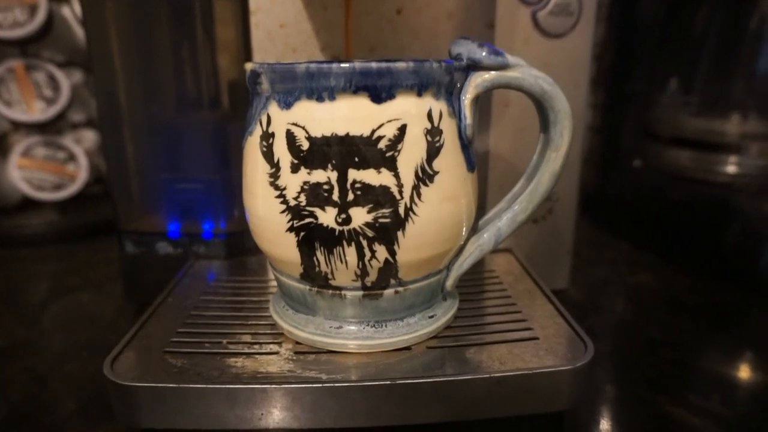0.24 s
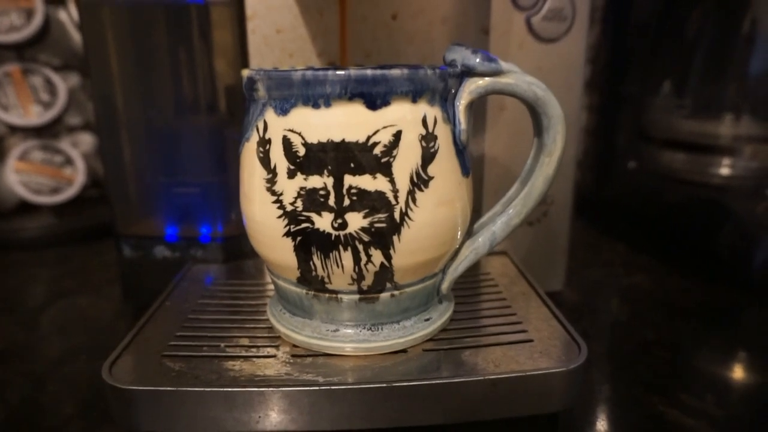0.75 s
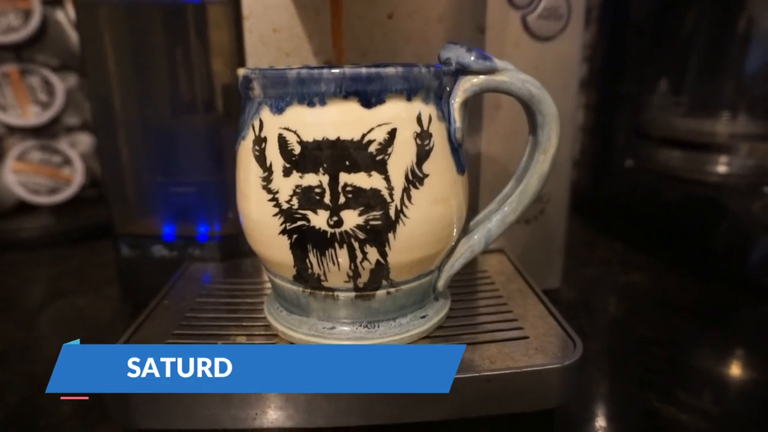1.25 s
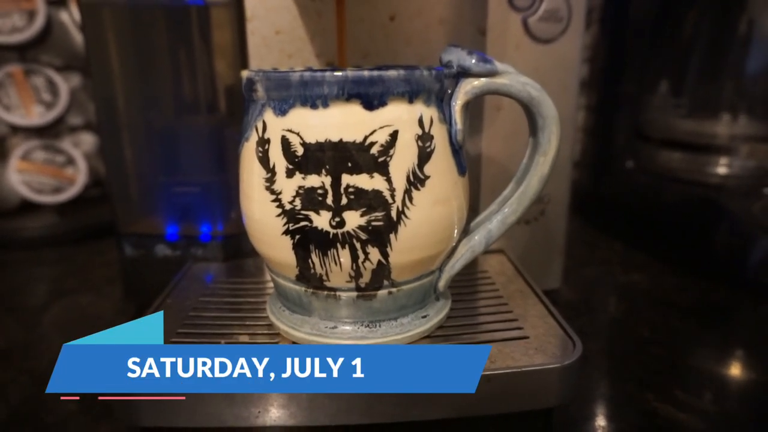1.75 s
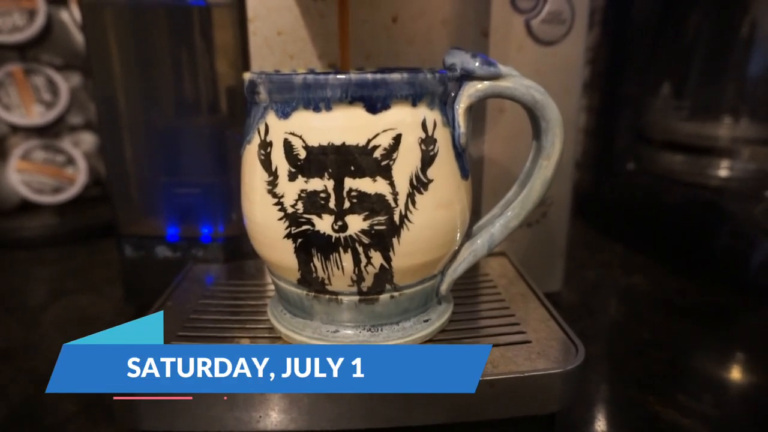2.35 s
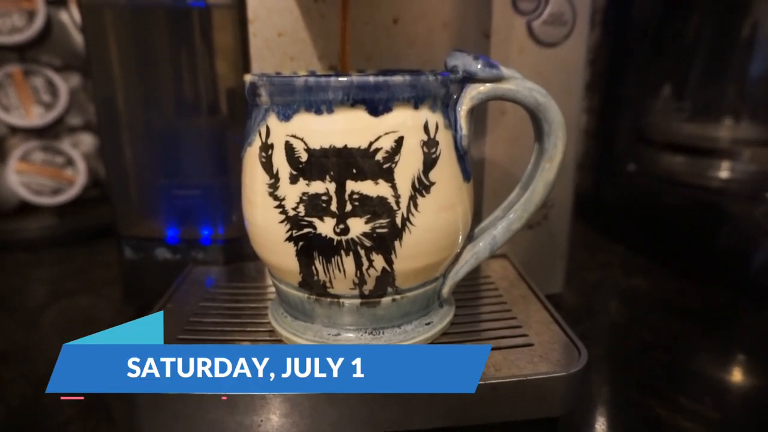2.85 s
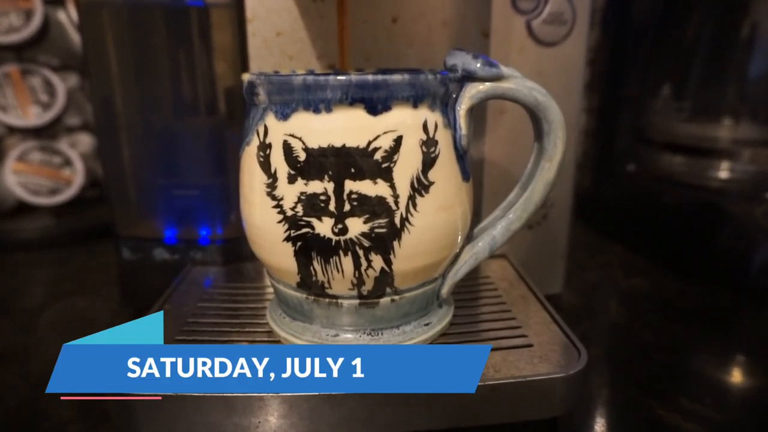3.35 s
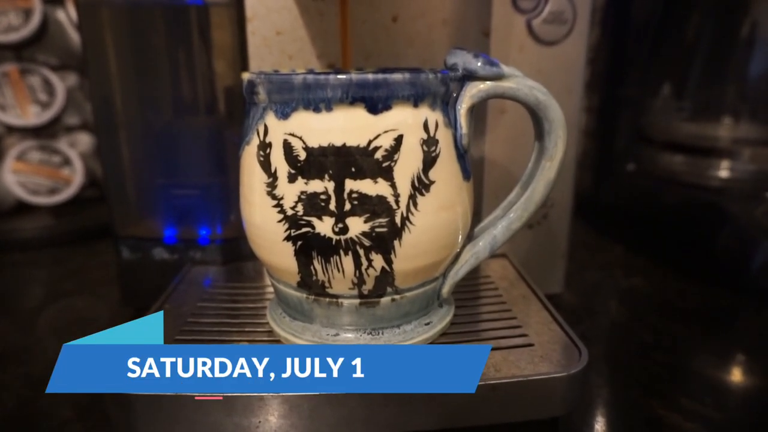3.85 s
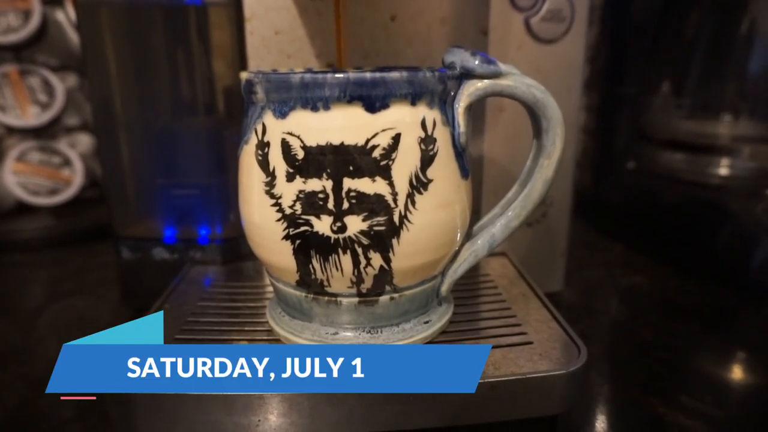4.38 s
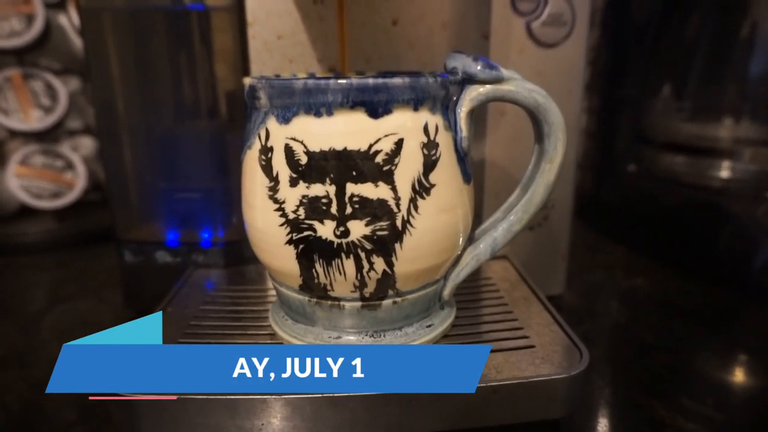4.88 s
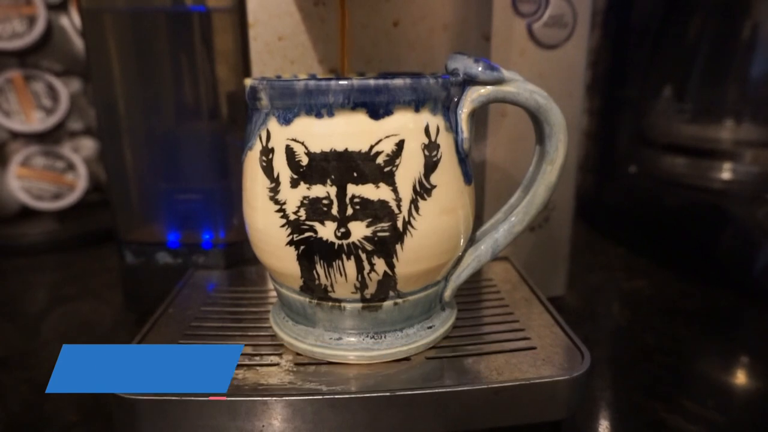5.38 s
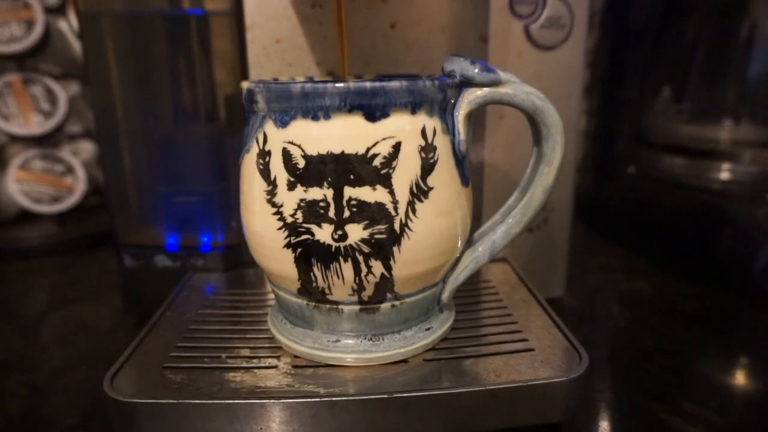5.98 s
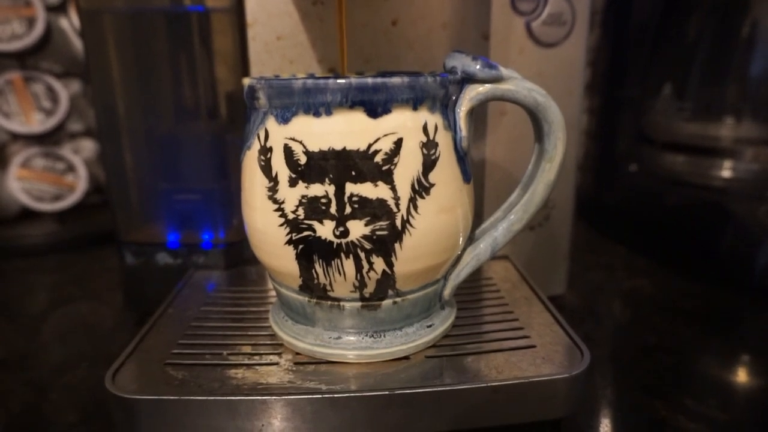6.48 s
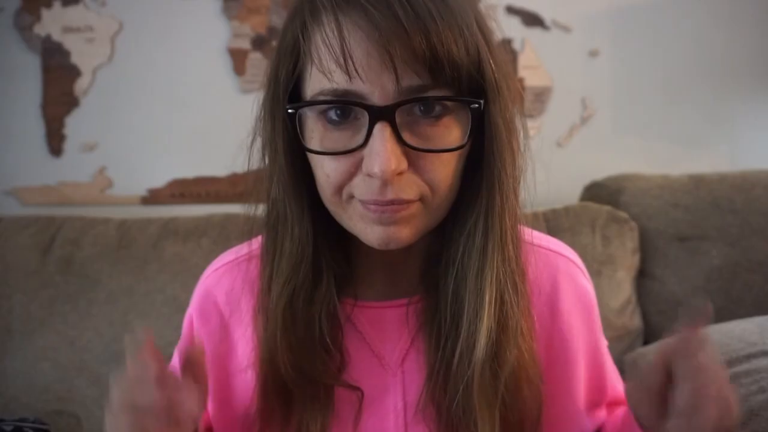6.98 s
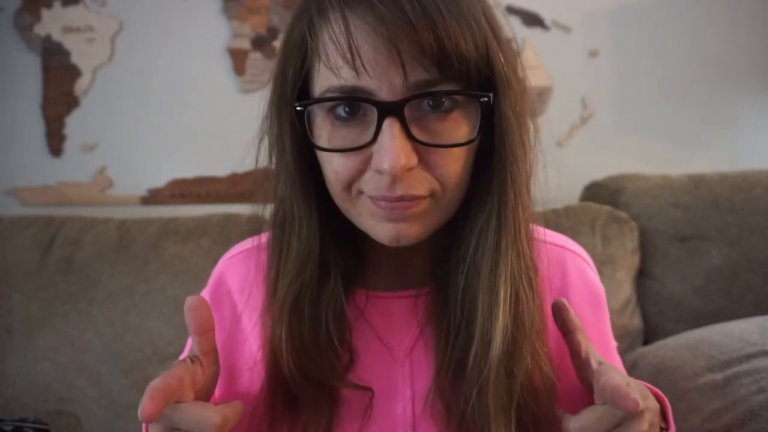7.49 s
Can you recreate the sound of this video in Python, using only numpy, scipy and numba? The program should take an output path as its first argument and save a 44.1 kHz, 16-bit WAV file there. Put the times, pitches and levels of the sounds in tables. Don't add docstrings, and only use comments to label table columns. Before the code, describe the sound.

Close up, coffee trickles into a stoneware mug, first splashy and ringing, then gurgling rapidly with plinking droplets, before an abrupt near-silent room tone.

```python
import sys
import numpy as np
from scipy import signal
from scipy.fft import rfft, irfft, next_fast_len
from scipy.io import wavfile
from scipy.ndimage import uniform_filter1d
from numba import njit

SR = 44100
rng = np.random.default_rng(int(sys.argv[2]) if len(sys.argv) > 2 else 0)


def wrap_up_sound(samples):
    columns = np.atleast_2d(samples).T
    tamed = np.clip(columns, -1, 1)
    steps = np.round(tamed * 32767).astype(np.int16)
    wavfile.write(sys.argv[1], SR, steps)


def nominal_scale(level):
    x = np.asarray(level, float) / 20
    return 10 ** x


N = 340829
T = np.arange(N) / SR

# (time [s], resonance [Hz], left minus right [dB])
AIR_COLUMN = [
    (0, 618, 0),
    (1.8, 664, 2),
    (2.5, 778, 3.5),
    (7, 736, 4),
]
# (time [s], depth [0-1])
PLUNGE = [
    (0, 0),
    (1.5, 0.01),
    (2.0, 0.39),
    (3, 0.59),
    (4.4, 0.39),
    (5.3, 0.86),
    (6.1, 0.77),
    (7, 0.93),
]
# (depth [0-1], level [dB])
AIR_LEVEL = [(0, -36), (.2, -35), (.36, -45), (.55, -41), (1.05, -40)]
# (shallow level [dB], deep level [dB])
POOL_LEVEL = (-34, -42)
WALL_LEVEL = (-37, -47)
# (time [s], level [dB])
MIST_LEVEL = [
    (0, -50),
    (1.2, -43.5),
    (2.3, -49),
    (7, -52),
]
# (time [s], lift [dB], length [s])
WALL_SURGES = [(.07, 8.5, 0.078), (.19, 11.5, 0.066), (.285, 9, 0.023), (.345, 12.5, 0.043),
               (.435, 9.5, 0.034), (.52, 3.5, 0.12), (.63, 11.5, 0.031), (.72, 11.5, 0.074),
               (.91, 10, 0.077), (1.12, 7.5, 0.14)]
# (time [s], lift [dB], length [s])
AIR_SWELLS = [(.33, 7.7, 0.024), (.47, 1.3, 0.024), (.63, 3.7, 0.023), (.73, 3.3, 0.094), (.98, 2.5, 0.052),
              (1.12, 6.8, 0.032), (1.3, 4.5, 0.12), (1.5, 9.1, 0.078), (1.72, 8, 0.08), (1.93, 5.9, 0.094)]
STREAM_BREAKS = [.245, .31, .672, .975]
# (frequency [Hz], width [Hz], level [dB])
POOL_MODES = [(996, 83, 3.5), (1185, 168, 2.5), (1418, 300, -3), (925, 83, -0.5)]
WALL_MODES = [(1998, 330, -4), (2400, 117, -2.5), (2640, 99, -0.5), (2950, 73, 3.5), (3198, 290, -7),
              (4020, 127, -2), (4804, 150, -11)]
# (frequency [Hz], level [dB per Hz])
SPRAY_COLOUR = [(3000, -7.5), (4500, 6.5), (5300, 4), (8000, 3), (10700, 0), (16000, -5.5)]
# (frequency [Hz], level [dB rms])
HUM_LINES = [(93.5, -69), (118.4, -62.5), (149, -67.5), (188.4, -67), (296.1, -63.5), (419.9, -55)]
# (frequency [Hz], level [dB per Hz])
KITCHEN_COLOUR = [(25, -36), (50, -26.5), (108, -17), (230, -14.5), (420, -12.5), (600, -0.5),
                  (1500, -19.5), (16000, -64)]
LOUNGE_COLOUR = [(25, -27), (90, -15), (155, -20), (270, -14.5), (420, -21.5), (840, -16), (1600, -18.5),
                 (16000, -42)]
# (time [s], peak level [dB], pitch [Hz]); the second table holds further, mostly fainter spits
STREAM_SPITS = [(0.177, -28, 11300), (0.2985, -16, 6630), (0.4003, -17.5, 7700), (0.4371, -26.5, 14400),
                (0.9062, -25.5, 7640), (1.082, -21, 13700), (1.1134, -22.5, 5860), (1.1406, -25, 6840),
                (1.2963, -24.5, 6500), (1.4125, -24.5, 6040), (1.5344, -26, 7000), (1.6246, -23.5, 6000),
                (1.638, -16.5, 12370), (1.9205, -25.5, 6060), (2.0339, -20.5, 6170), (2.144, -24, 5980),
                (2.177, -26.5, 13000), (2.6675, -25.5, 10230), (3.214, -22, 6800), (3.791, -19.5, 6160),
                (4.0987, -22, 9300), (4.1675, -19.5, 6310), (4.202, -25, 5960), (4.24, -17, 11520),
                (5.8965, -26, 7740), (5.9163, -26, 8900), (5.9467, -24, 5730), (6.2711, -22.5, 6870),
                (6.7905, -24.5, 7200), (6.9748, -17, 6330)]
MORE_SPITS = [(0.262, -29.5, 13600.0), (0.4086, -31, 9400), (0.6854, -32.5, 11430.0),
              (1.021, -31.0, 6400), (1.0627, -29, 14200), (1.1667, -46, 10620.0), (1.4552, -30, 6440),
              (1.5674, -33, 9000), (1.6172, -29.5, 6130), (1.6786, -30, 9850), (1.788, -36.5, 10800),
              (1.9344, -30.5, 8900), (2.464, -31.5, 11600), (2.8178, -29.5, 5430), (3.423, -32, 9890.0),
              (3.858, -32, 10000), (4.4128, -32, 9800), (4.8202, -26.5, 8430), (5.262, -31.5, 8460),
              (5.3646, -34.5, 7900), (5.421, -28.5, 8900), (5.63, -30.5, 9600), (5.9784, -29, 9300),
              (6.9447, -28.5, 7200)]
# (time [s], pitch [Hz])
FAINT_SPITS = [(0.446, 9100), (1.034, 8140), (1.385, 7750), (1.7407, 12850), (1.975, 5700), (2.7805, 6200),
               (3.081, 10200), (3.2792, 7880), (4.551, 7100), (5.9584, 9050), (6.577, 6800)]
# (time [s], peak level [dB], pitch [Hz])
STREAM_PLINKS = [(0.1946, -25, 2640), (0.77, -15.5, 4930), (0.7918, -18, 2950), (1.1111, -20, 2650),
                 (1.1747, -19, 2180), (1.2967, -21.5, 2500), (1.4298, -19, 2260), (1.535, -19.5, 4830),
                 (1.807, -14.5, 2527), (1.8843, -20, 2740), (2.1566, -20.5, 2460), (2.4172, -19, 2530),
                 (2.68, -23.5, 4000), (2.7222, -19.5, 4050), (2.781, -17, 2850), (3.3653, -21, 3100),
                 (3.6965, -18.5, 3930), (3.7904, -18.5, 4080), (3.9487, -24, 2890), (3.9804, -21.5, 2620),
                 (4.0987, -15, 3940), (4.1471, -20.5, 2990), (4.8206, -18.5, 3970), (5.6156, -25.5, 4030),
                 (5.7024, -22.5, 4020), (5.9164, -16.5, 2750), (6.0528, -18, 2900), (6.5753, -21.5, 3930),
                 (6.7269, -22, 3000), (6.9749, -20.5, 4160)]
MORE_PLINKS = [(1.3197, -29, 2540), (1.369, -24.5, 2790), (1.4129, -29, 3670), (1.57, -27.0, 2880),
               (1.698, -25, 3770), (1.7574, -28, 2670), (1.817, -27, 2780), (1.8423, -26, 3520),
               (1.9102, -26, 2540), (2.0382, -23, 3600), (2.1867, -28, 2390), (2.4306, -24, 2820),
               (2.4639, -22.5, 2600), (2.5453, -28, 2420), (2.5856, -24.5, 2700), (2.6349, -19.5, 2620),
               (2.7655, -26.0, 2760), (2.993, -27.5, 2760), (3.0176, -30, 2710), (3.3374, -20, 2640),
               (3.4234, -25, 2850), (3.5474, -26, 2590), (3.6268, -25, 3180), (3.892, -23.5, 2770),
               (3.9137, -26.5, 3150), (3.9943, -26, 3280), (4.1159, -34, 2500), (4.202, -28, 2870),
               (4.5152, -24, 3560), (5.152, -23, 2490), (5.2293, -26, 2890), (5.2628, -22.5, 2850),
               (5.364, -25.5, 3010), (5.9475, -24, 3440), (6.48, -25, 2580), (6.7911, -25, 2800)]
# (time [s], pitch [Hz])
FAINT_PLINKS = [(1.0405, 2180), (2.2514, 2590), (2.845, 2650), (3.317, 2650), (4.8857, 2400), (4.906, 2030),
                (5.282, 4100), (5.33, 3880), (5.3414, 2910), (5.75, 3940), (6.213, 2360), (6.886, 2900),
                (6.904, 2910)]
# (time [s], peak level [dB], pitch [Hz])
FIRST_BUBBLES = [(0.3236, -31, 653), (0.3461, -25, 606), (0.6323, -22.0, 670.0), (0.6431, -30, 684),
                 (0.7432, -26, 640), (0.8082, -24.0, 696), (1.0432, -31, 670), (1.1236, -28, 674),
                 (1.2485, -33, 670.0), (1.3695, -18, 640), (1.51, -24, 650), (1.7592, -21.5, 760.0)]
# (time [s], peak level [dB], pitch [Hz], time to fall 10 dB [ms])
DEEPENING_GULPS = [(2.0524, -20, 730, 7.5), (2.1573, -15.5, 780, 11.5), (2.4178, -20.5, 788, 7.5),
                   (2.5466, -10, 787, 8.5), (2.5694, -19, 799, 7.2), (2.5851, -19, 770, 5),
                   (2.6068, -12.5, 780, 8.5), (2.6356, -8.0, 800, 8.5), (2.7966, -16, 808, 12.5),
                   (2.9173, -8.5, 784, 8.5), (2.9343, -11.5, 740, 8.3), (2.9575, -12, 795, 8),
                   (2.9708, -10.5, 765, 7), (2.9933, -18.5, 763, 14.3), (3.0818, -19.5, 795, 9.1),
                   (3.1009, -19, 668, 13.5), (3.1293, -20, 758, 17), (3.2277, -11, 765, 10.5),
                   (3.2464, -21.5, 767, 11.5), (3.2898, -18, 744, 9), (3.3175, -11.5, 781, 3),
                   (3.3247, -20, 770, 10.5), (3.3381, -14, 790, 11), (3.424, -10, 780, 3),
                   (3.4341, -18, 794, 4), (3.4446, -16, 780, 13), (3.4682, -12, 780, 6),
                   (3.524, -18.5, 803, 13), (3.5905, -16.5, 796, 5), (3.6009, -20.5, 770, 9),
                   (3.6135, -15.5, 770, 7.5), (3.6283, -7.0, 707, 7.5), (3.6376, -15, 737, 9.5),
                   (3.6965, -17, 816, 6), (3.7235, -18.5, 793, 15), (3.8697, -7.5, 762, 10.5),
                   (3.8932, -11, 795, 9), (3.9141, -17, 770, 9), (3.9497, -24, 790, 14),
                   (3.9816, -18.0, 810, 7), (3.9956, -14.0, 786, 9), (4.0498, -22.5, 800, 7.5),
                   (4.0993, -18, 775, 9.5), (4.117, -7.5, 807, 10.5), (4.1479, -12.5, 776, 10.5),
                   (4.1761, -21, 770, 9.5)]
# (time [s], peak level [dB], pitch [Hz], time to fall 10 dB [ms])
MIDDLE_GULPS = [(4.204, -14, 770, 7), (4.2412, -14.5, 796, 9.5), (4.2603, -9, 797, 9.5),
                (4.2956, -14.5, 774, 7), (4.3263, -15.0, 807, 11), (4.344, -21, 756, 8.5),
                (4.3746, -19, 774, 14.5), (4.3903, -20.0, 790, 8.2), (4.4402, -20, 760, 7),
                (4.4643, -14.0, 776, 10), (4.516, -14.0, 770, 6), (4.5291, -14.5, 750, 4.5),
                (4.571, -8, 741, 10.5), (4.5998, -12, 767, 7.5), (4.6109, -16.5, 790, 4),
                (4.6491, -15.5, 800, 8), (4.7291, -18.5, 776, 2.5), (4.745, -8.5, 730, 6.5),
                (4.7627, -7.5, 657, 7.5), (4.7751, -21.5, 737, 2.5), (4.7857, -12.5, 691, 6),
                (4.822, -10, 800, 8), (4.837, -16.5, 790, 9), (4.9202, -16, 720, 6),
                (4.9746, -9.5, 784, 10), (5.0427, -12, 714, 2.5), (5.0526, -15, 760, 10.5),
                (5.1152, -9, 806, 11), (5.1429, -12.0, 790, 7), (5.1532, -16, 750, 7.5),
                (5.1668, -20, 745, 11.5), (5.1924, -6, 693, 4.5), (5.2022, -20.5, 737, 21),
                (5.231, -7, 710, 4), (5.242, -22, 715, 13), (5.2639, -7.5, 797, 9.4),
                (5.2829, -11.5, 702, 4.5), (5.2887, -21.5, 771, 14), (5.332, -23, 780, 19.5),
                (5.366, -7, 737, 7), (5.3888, -16.5, 830, 10), (5.4065, -16, 830, 12.5),
                (5.4463, -6, 714, 5), (5.4679, -13.5, 690, 9.5), (5.483, -17, 764, 7),
                (5.4948, -5.5, 712, 4.5), (5.5026, -16.5, 750, 15.5)]
# (time [s], peak level [dB], pitch [Hz], time to fall 10 dB [ms])
LATE_GULPS = [(5.5723, -16.5, 762, 10), (5.5873, -15.5, 750, 7.5), (5.6005, -9.5, 730, 7.0),
              (5.6156, -17, 744, 4.5), (5.7034, -14.5, 741, 4.5), (5.7253, -15.0, 786, 10.6),
              (5.751, -22.5, 770, 14), (5.79, -10.5, 663, -1), (5.812, -16, 750, 5),
              (5.8317, -21, 715, 12), (5.862, -20.5, 785, 14), (5.8839, -22.5, 763, 7),
              (5.8981, -20.5, 795, 10.3), (5.9186, -11, 785, 10.6), (5.9482, -10, 814, 8),
              (5.9628, -18.0, 800, 7.5), (5.9792, -6.5, 784, 10), (6.0543, -11.5, 746, 7.5),
              (6.0986, -14.5, 775, 15.5), (6.1869, -14.5, 780, 10.5), (6.2112, -16.0, 730, 10.5),
              (6.2727, -21, 779, 7), (6.2916, -19.5, 790, 6.5), (6.3271, -16.5, 787, 9.5),
              (6.4183, -21.5, 740, 5.5), (6.458, -18, 700, 5), (6.4815, -9, 790, 11.5),
              (6.5074, -19, 754, 7), (6.518, -11.5, 769, 10.5), (6.5491, -12.5, 760, 4),
              (6.5767, -13.5, 810, 9.0), (6.5926, -10, 690, 4.3), (6.6038, -16.5, 755, 10),
              (6.6214, -19.5, 750, 10), (6.6361, -13.5, 806, 8), (6.7065, -17.5, 720, 2),
              (6.7249, -21, 730, 6.5), (6.7594, -15, 657, 11), (6.769, -15.5, 777, 13.5),
              (6.7919, -10, 753, 10.5), (6.8127, -17.5, 795, 13.5), (6.8369, -15, 796, 5.5),
              (6.8863, -21.5, 820, 10), (6.9066, -23, 804, 13), (6.926, -18.0, 740, 6),
              (6.945, -17.5, 720, 5.7), (6.9756, -15, 818, 9.5)]
# (time [s], peak level [dB])
FLAT_SLAPS = [(1.9986, -21), (2.053, -27), (2.0654, -22), (2.121, -22.5), (2.1572, -14.5), (2.185, -22),
              (2.547, -13.5), (2.5707, -23), (2.5885, -20.5), (2.6125, -33), (2.6353, -24), (2.78, -36),
              (2.8463, -32), (2.923, -24), (2.934, -26.5), (2.9563, -19), (2.9942, -22.5), (3.3389, -13),
              (3.3656, -22), (3.4247, -25), (3.6978, -26), (4.0995, -19.5), (4.115, -26.5), (4.245, -18),
              (4.2612, -27), (4.3273, -26), (4.374, -22.5), (4.4983, -21), (4.572, -22.5), (4.822, -17.5),
              (5.1177, -22.5), (5.1376, -21.5), (5.2305, -25.0), (5.263, -24), (5.4065, -19.5),
              (5.954, -21.5), (6.037, -21), (6.4824, -24), (6.8366, -20.5), (6.9762, -11.5)]


def level(x, db):
    return x * nominal_scale(db) / np.sqrt(np.mean(x ** 2))


def follow(table):
    return np.interp(T, *np.transpose(table))


def colour(x, points):
    hz, db = np.transpose(points)
    size = next_fast_len(N)
    bin_hz = np.arange(size // 2 + 1) * SR / size
    gain = nominal_scale(np.interp(np.log(bin_hz + 1), np.log(hz), db))
    return irfft(rfft(x, size) * gain, size)[..., :N]


def ring(x, modes):
    out = 0
    for k, (hz, width, db) in enumerate(modes):
        out = out + (-1) ** k * nominal_scale(db) * signal.lfilter(*signal.iirpeak(hz, hz / width, SR), x)
    return out


@njit
def air_resonance(x, hz, width):
    out, band, low = np.empty(len(x)), 0., 0.
    for i in range(len(x)):
        g, k = np.tan(np.pi * hz[i] / SR), width / hz[i]
        v = (band + g * (x[i] - low)) / (1 + g * (g + k))
        band, low = 2 * v - band, low + 2 * g * v
        out[i] = k * v
    return out


@njit
def grains(s, size, hz, t60, rise, glide, bend=1.):
    out = np.zeros(N)
    for k in range(len(s)):
        start, phase = int(s[k] * SR), 0.
        for i in range(min(int((t60[k] + rise[k]) * SR), N - start)):
            t = i / SR
            phase += 2 * np.pi * min(hz[k] * (1 + glide[k] * t / t60[k]), .45 * SR) / SR
            fade = (max(t - rise[k], 0.) / t60[k]) ** bend
            swell = min(t / rise[k], 1.)
            out[start + i] += size[k] * swell * np.exp(-np.log(1000) * fade) * np.sin(phase)
    return out


def walk(rate):
    k = int(SR / rate)
    held = np.repeat(rng.standard_normal(N // k + 1), k)
    return 1.39 * uniform_filter1d(uniform_filter1d(held, k), k)[:N]


def lifts(table):
    return sum(db * np.clip(1 - np.abs(T - s) / length, 0, 1) for s, db, length in table)


def thrown(table, more, faint, faint_db):
    return np.vstack([table, more, np.insert(np.array(faint, float), 1, faint_db, axis=1)])


def patter(rate, spread_db, hiss):
    fizzle_s = 0.00096
    size = nominal_scale(spread_db * np.minimum(rng.exponential(size=N), 4))
    impacts = (rng.random(N) < rate / SR) * size
    fizzle = signal.lfilter([1], [1, -np.exp(-1 / (fizzle_s * SR))], impacts)
    return level(fizzle * rng.standard_normal(N), 0) + hiss * rng.standard_normal(N)


def gurgle(count, low_hz, high_hz, cycles, spread_db):
    s, pitch, size, glide = rng.random((count, 4)).T
    hz = low_hz * (high_hz / low_hz) ** pitch
    crowd = grains(s * N / SR, nominal_scale(spread_db * size ** 2), hz, cycles / hz, 2.15 / hz, 0.44 * glide)
    return level(crowd, 0)


def stream():
    hush_db, hush_s = -6, 0.022
    tear_db, tear_s = -7.5, 0.016
    air_wakes_s, pool_share = 0.096, 0.17
    depth, surge, swell = follow(PLUNGE), lifts(WALL_SURGES), lifts(AIR_SWELLS)
    gulps = [*DEEPENING_GULPS, *MIDDLE_GULPS, *LATE_GULPS]
    pauses = [(row[0] - hush_s / 2, hush_db, hush_s) for row in gulps if row[1] > -15]
    hush = np.maximum(lifts(pauses), hush_db)
    tear = lifts([(s, tear_db, tear_s) for s in STREAM_BREAKS])
    air_db = np.interp(depth, *np.transpose(AIR_LEVEL)) - 20 * np.exp(-T / air_wakes_s)
    air_db = air_db + tear + swell + hush
    pool_db = POOL_LEVEL[0] + depth * np.diff(POOL_LEVEL) + pool_share * surge + tear + hush
    wall_db = WALL_LEVEL[0] + depth * np.diff(WALL_LEVEL) + surge + tear / 2
    return air_db, pool_db, wall_db


def splash(air_hz):
    air_db, pool_db, wall_db = stream()
    broken = np.interp(T, [1.2, 2.2], [0, 1])
    flow = walk(40) * (0.52 + 0.33 * broken)
    dense = gurgle(count=2600, low_hz=485.5, high_hz=1410.0, cycles=90.0, spread_db=2.0)
    sparse = gurgle(count=1000, low_hz=600.0, high_hz=1158.0, cycles=13.0, spread_db=5.0)
    froth = (1 - broken) * dense + 0.82 * broken * sparse
    wash = (1.4 - 0.23 * broken) * patter(600, 0.72, 1.0)
    air = air_resonance(froth + wash, air_hz * (1 + 0.04 * walk(18)), 68.0)
    pool = ring(froth + wash, POOL_MODES)
    fizz = gurgle(count=1800, low_hz=1990.0, high_hz=4830.0, cycles=14.8, spread_db=9.5)
    wall = ring((0.97 + 0.12 * broken) * fizz + 1.02 * patter(650, 2.3, 2.08), WALL_MODES)
    mist = gurgle(count=1500, low_hz=4260.0, high_hz=14500.0, cycles=27.0, spread_db=31.0)
    spray = colour(0.7 * mist + patter(200, 4.7, 1.0), SPRAY_COLOUR)
    air = level(air, 0.13) * nominal_scale(air_db + 2.3 * np.minimum(flow, 0))
    pool = level(pool, -0.79) * nominal_scale(pool_db + 3.9 * np.minimum(flow, .6))
    wall = level(wall, -1.2) * nominal_scale(wall_db + 2.76 * flow)
    spray = level(spray, 0.082) * nominal_scale(follow(MIST_LEVEL) + 2.8 * flow)
    return air + pool + wall + spray


def machine():
    hum = 0
    for hz, db in HUM_LINES:
        loudness = nominal_scale(db + 2.75 * walk(9.0)) * np.sqrt(2)
        pitch = hz * (1 + 0.00575 * walk(7))
        hum = hum + loudness * np.sin(2 * np.pi * np.cumsum(pitch) / SR)
    return hum


def air_tone(points, db):
    mid, side = rng.standard_normal((2, N))
    side = colour(side, [(60, -21.5), (300, -15.5), (2000, -0.5), (16000, 2)])
    return level(colour(np.array([mid + side, mid - side]), points), db)


def spits():
    s, db, hz = thrown(STREAM_SPITS, MORE_SPITS, FAINT_SPITS, -26.5).T
    s, t60 = s - .0008, 0.0084 + 0.012 * rng.random(len(s))
    puff = grains(s, nominal_scale(db + 0.5), hz, t60, 0 * hz + 0.00083, 0 * hz + 0.23)
    lowpass = signal.butter(2, 2500, fs=SR, output="sos")
    rough = level(signal.sosfilt(lowpass, rng.standard_normal(N)), -7.5)
    crackle = colour(np.abs(puff) * rng.standard_normal(N), SPRAY_COLOUR)
    return puff * (0.5 + rough) + 0.67 * crackle


def droplets():
    s, db, hz = thrown(STREAM_PLINKS, MORE_PLINKS, FAINT_PLINKS, -25.5).T
    chance = rng.random((len(s), 2)).T
    cycles = 34.4 * (0.43 + 1.87 * chance[0])
    s, t60 = s - .0006, cycles / hz
    plink = grains(s, nominal_scale(db - 2.5), hz, t60, 1.2 / hz, 0.05 + 0.25 * chance[1] ** 2)
    burst = np.abs(grains(s, nominal_scale(db + 7.5), hz, 0.93 * t60, 1.0 / hz, 0 * hz))
    burst = burst * rng.standard_normal(N)
    burst = signal.sosfilt(signal.butter(2, [1400, 7000], "band", fs=SR, output="sos"), burst)
    return 1.27 * plink + 0.21 * burst + 0.35 * ring(plink + 5.76 * burst, WALL_MODES)


def bubbles(air_hz):
    first_ms, opening_db = 7.9, -20.5
    swell_cycles, collapse = 2.5, 1.6
    first = np.insert(np.array(FIRST_BUBBLES, float), 3, first_ms, axis=1)
    s, db, hz, ms = np.vstack([first, DEEPENING_GULPS, MIDDLE_GULPS, LATE_GULPS]).T
    chance = rng.random((len(s), 2)).T
    rise = swell_cycles / hz
    s = s - rise / 2
    t60 = np.maximum(ms / 1000 - rise / 2, .002) * (60 / 10) ** (1 / collapse)
    sing = grains(s, nominal_scale(db - 1.0), 0.9677 * hz, t60, rise, 0.058 + 0.12 * chance[0], collapse)
    tick_db = db + opening_db - 9.1 * chance[1]
    opening = grains(s, nominal_scale(tick_db), hz, 0 * s + 0.0074, 0 * s + 0.00028, 0 * s)

    s, db = np.transpose(FLAT_SLAPS)
    chance = rng.random((len(s), 2)).T
    s, slap_hz = s - .001, 1030 + 150 * chance[0]
    slap = grains(s, nominal_scale(db + 1.0), slap_hz, 0 * s + 0.024, 0 * s + 0.002, 0 * s + 0.04)
    impact_db = db - 9.1 * chance[1]
    impact = grains(s, nominal_scale(impact_db), 0 * s + 770, 0 * s + 0.008, 0 * s + 0.00028, 0 * s)
    crack = np.abs(opening + impact) * rng.standard_normal(N)
    song = sing + 0.18 * air_resonance(sing, air_hz, 40.0)
    slaps = 0.99 * slap + 0.69 * ring(slap, POOL_MODES)
    return song + slaps + 0.3 * ring(crack, WALL_MODES) + 0.05 * colour(crack, SPRAY_COLOUR)


def echoes(high):
    echo_db, t60_s, size = -14, 0.093, SR // 8
    tail = rng.standard_normal((2, size)) * nominal_scale(-60 * T[:size] / t60_s)
    tail = level(tail, echo_db) / np.sqrt(size)
    return signal.fftconvolve(high[None], tail, axes=1)[:, :N]


def lean(low, high, sides, pan_db):
    wander = 0.17 * high * walk(70) - 0.04 * colour(high, [(6000, -8), (13000, 4), (16000, 9)])
    early = 2.5 * np.gradient(low)
    shifting = 1.42 * sides * walk(15)
    favour = low * (nominal_scale(np.array([pan_db, -pan_db]) / 2) - 1)
    return favour + (wander + early + shifting) * np.array([[1], [-1]])


def lounge():
    balance_db = np.array([[-1.5], [1.5]]) + 0.5 * walk(2.91)
    room = air_tone(LOUNGE_COLOUR, -56) * nominal_scale(balance_db)
    return room + nominal_scale(-65.0) * np.sin(2 * np.pi * 91.5 * T)


def scene():
    s, hz, pan = np.transpose(AIR_COLUMN)
    air_hz, pan_db = np.interp(T, s, hz), np.interp(T, s, pan)
    mug = splash(air_hz) + spits() + droplets() + bubbles(air_hz)
    mug = colour(mug, [(1500, 1), (1750, -0.5), (1950, -1.5), (16000, 1.0)])
    low = colour(mug, [(800, -3.5), (1050, -7), (1800, -48)])
    high = colour(mug, [(700, -65.0), (1200, 4.0), (2000, 5.0), (16000, 7.5)])
    front, sides = echoes(high)
    kitchen = mug + front + lean(low, high, sides, pan_db)
    kitchen = kitchen + machine() + air_tone(KITCHEN_COLOUR, -41)
    change_s = 6.988
    fade_out = np.clip((change_s - T) / 0.0021, 0, 1)
    fade_in = np.clip((T - change_s - .004) / 0.026, 0, 1)
    return kitchen * fade_out + lounge() * fade_in


def band_limit(x):
    return signal.sosfilt(signal.butter(12, 15900, fs=SR, output="sos"), x)


def record(dry):
    top_hz = 16350
    lowpass = signal.ellip(8, .2, 60, top_hz, fs=SR, output="sos")
    mix = signal.sosfilt(lowpass, dry)
    return band_limit(mix)


dry = scene()
out = record(dry)
wrap_up_sound(out)
```